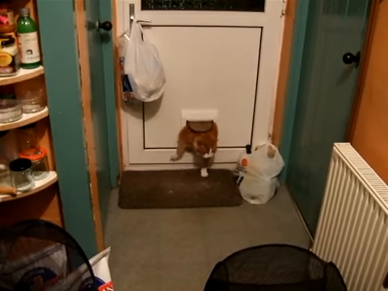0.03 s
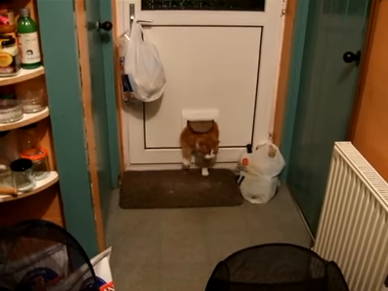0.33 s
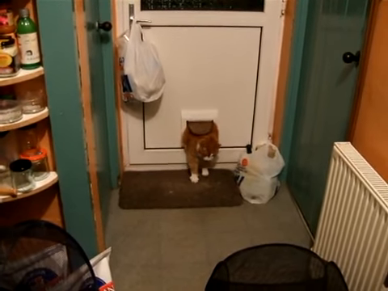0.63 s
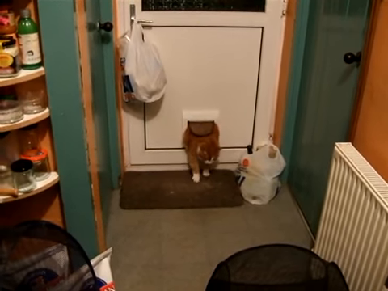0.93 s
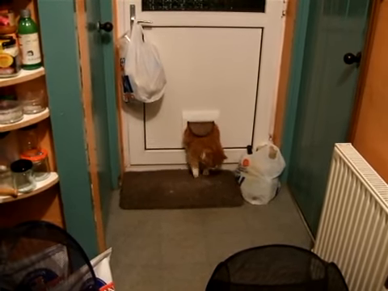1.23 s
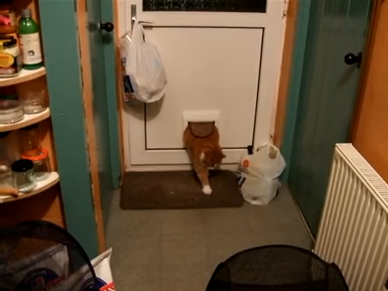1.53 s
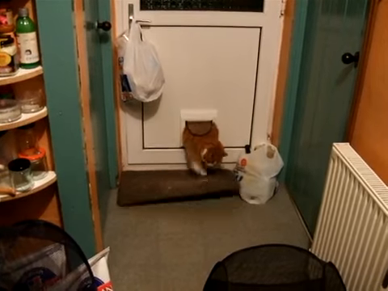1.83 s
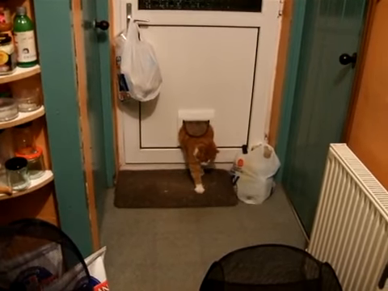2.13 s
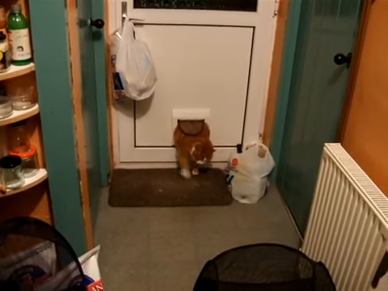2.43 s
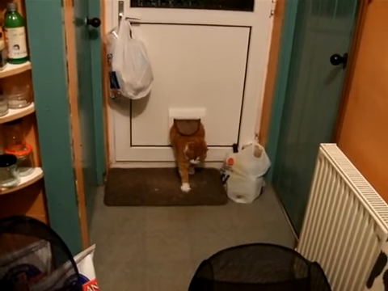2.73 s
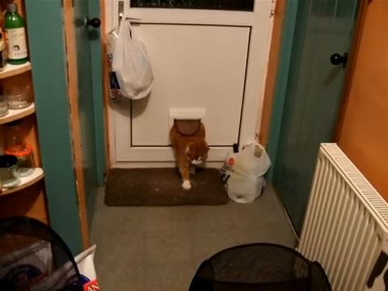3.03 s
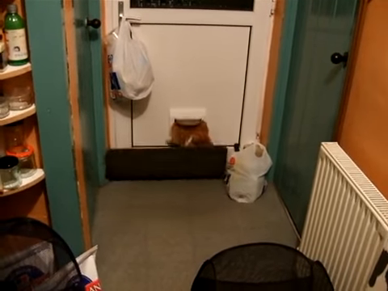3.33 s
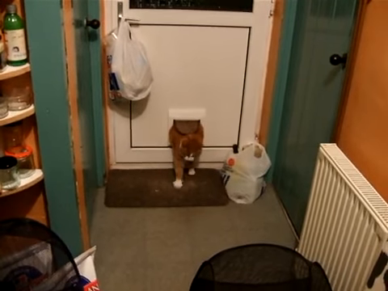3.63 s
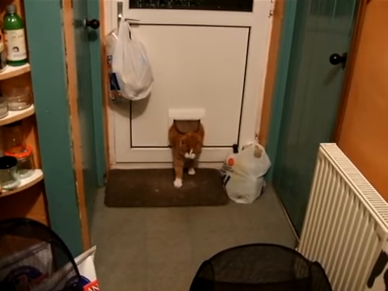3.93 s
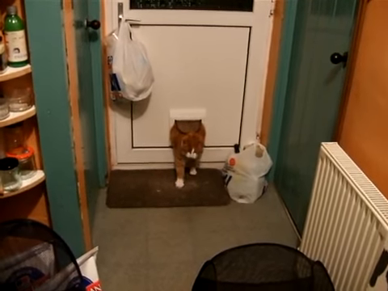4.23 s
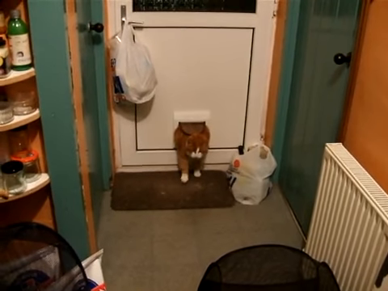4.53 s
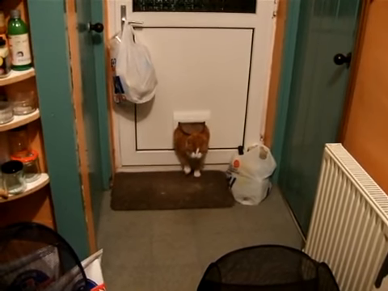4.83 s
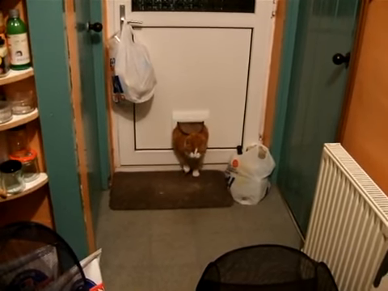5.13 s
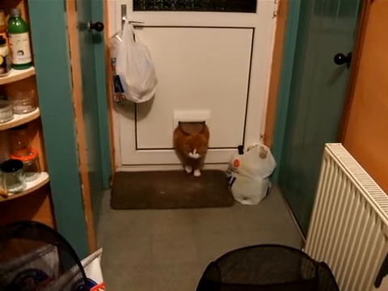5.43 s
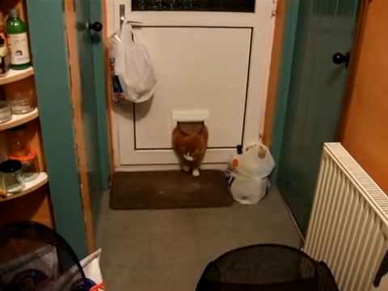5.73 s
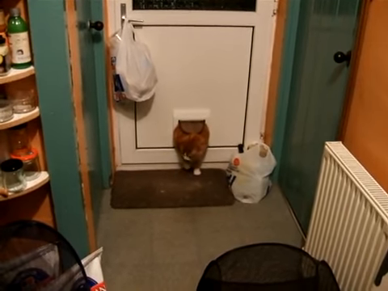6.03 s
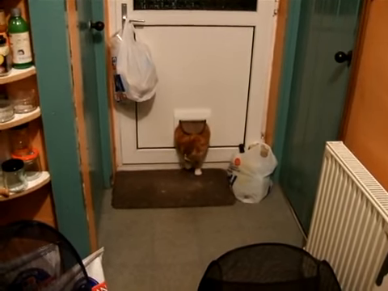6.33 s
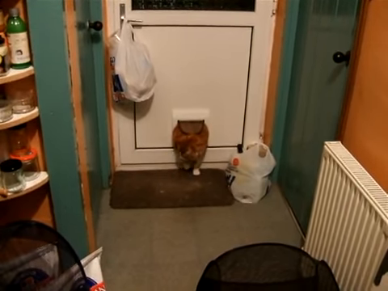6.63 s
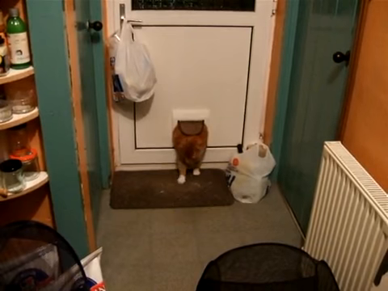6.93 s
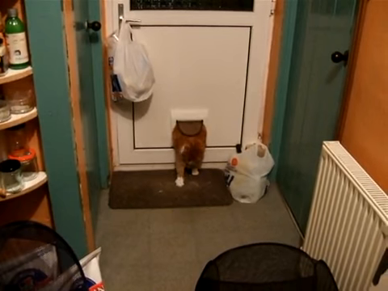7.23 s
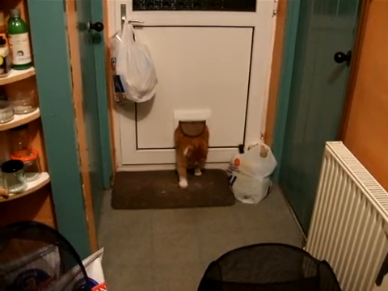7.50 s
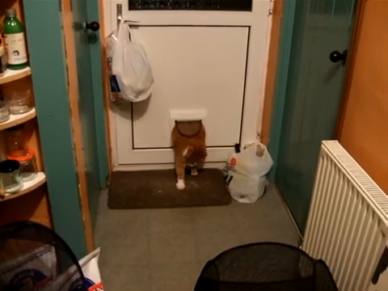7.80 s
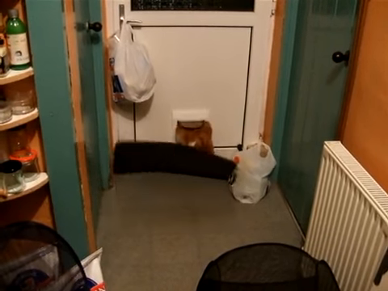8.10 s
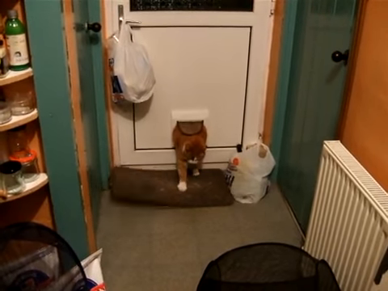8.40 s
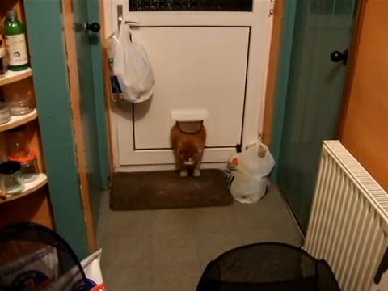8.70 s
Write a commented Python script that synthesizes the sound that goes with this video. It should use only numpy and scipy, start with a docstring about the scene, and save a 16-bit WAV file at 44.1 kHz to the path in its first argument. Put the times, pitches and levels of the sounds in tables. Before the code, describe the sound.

In a small, hard-walled hallway, a cat plucks at a bristly doormat and thumps a door with its paws. The mat scrapes, metal clinks, and then the mat slaps down with a loud, hollow snap. In a lull the cat mews once, faintly. The scratching resumes, ending in more flapping, slaps and a metallic ring. A small microphone picks up steady room hiss and a faint appliance hum underneath.

```python
"""Cat at the doormat

Halfway through a door flap, a cat paws at a bristly mat in a small, hard-walled hallway. Its paws
thump the door; its claws pluck the pile, drag the mat, lift it twice and let it slap back, many of the
hits with a short, hollow ring. Something metal is knocked and rings. In a pause the cat mews faintly.
Underneath, an appliance hums in the hiss of the room."""
import sys
import numpy as np
from scipy import signal
from scipy.fft import rfft, irfft, next_fast_len
from scipy.io import wavfile
from scipy.ndimage import uniform_filter1d, map_coordinates

SR = 44100
rng = np.random.default_rng(int(sys.argv[2]) if len(sys.argv) > 2 else 0)


def dump_mix(stems):
    """Bounce the given channels to the path in sys.argv[1] as a 16-bit WAV at rate SR."""
    frames = np.atleast_2d(stems).T  # one column per channel
    limited = np.clip(frames, -1, 1)  # hard clip at full scale
    pcm = np.round(limited * 32767).astype(np.int16)
    wavfile.write(sys.argv[1], SR, pcm)


N = 386316
RING = SR * 3 // 4  # samples given to one hit or one reverb tail

# Tone curves for the room's hiss and the microphone. Each row: frequency in Hz, gain in dB.
ROOM_TONE_EQ = [(12, -45), (20, -3.5), (71, -5), (250, -10), (420, -8.5), (552, -12), (807, -14.5),
                (8500, -22)]
MICROPHONE_EQ = [(8000, -0.5), (8600, -9.5), (9200, -18.5), (10250, -44.5)]
# The appliance's hum. Each row: frequency in Hz, average level in dB.
HUM_TONES = [(420, -59)]
# The hallway's reverb tail. Each row: frequency in Hz, t60 in seconds.
HALL_DECAY = [(300, 0.52), (1000, 0.32), (9000, 0.33)]
# The cat's throat resonances. Each row: centre in Hz with the mouth shut, centre in Hz with it
# wide open, half-width in Hz, gain in dB.
FORMANTS = [(520, 560, 110, -3.5), (1120, 1250, 200, -2), (1600, 2130, 170, -5.5), (1900, 2690, 115, 0),
            (4200, 3980, 120, -11)]
# The metal's modes. Each row: frequency in Hz, level in dB, free-ringing t60 in seconds.
METAL_MODES = [(2240, -7, .24), (2403, -3, .2), (2452, 1.5, .31), (3176, -6, .25), (3262, -7, .27),
               (4209, -2.5, .26), (4345, -7, .16), (5200, -13, .14), (5768, .5, .16), (7410, -11, .16),
               (8590, -17, .16)]
# Low resonances of the door and of the mat on the floor. Each row: centre in Hz, width in Hz, gain in dB.
DOOR_MODES = [(92, 11, 2.5), (150, 15, 3.5), (201, 37, -7.5), (283, 17, -6.5), (306, 110, -10)]
MAT_MODES = [(173, 65, -5), (293, 20, 7), (336.6, 43, 6), (386, 55, 2), (426, 57, 0.5)]
# Tone curves for the contact sounds. Each row: frequency in Hz, gain in dB.
BRISTLE_EQ = [(1200, -21), (2100, -3.5), (2700, -6.5), (4000, -4), (7000, -2.5), (10000, -8.5)]  # bright hiss of sliding bristles
RUB_EQ = [(200, -14), (450, -9.5), (850, -2), (1150, -7), (1700, -17), (3500, -17)]  # dull rub of the backing
THUD_EQ = [(52, -40.5), (74, -7), (90, 1.5), (150, 5.5), (240, -6.5), (345, 1.5), (520, -14), (1200, -34)]  # padded blow on the door
KNOCK_EQ = [(250, -16), (420, -4), (540, -1), (780, 4.5), (1050, 2.5), (1300, -5), (2200, -26.5)]  # boxy middle of a hit
CRUNCH_EQ = [(55, -35), (250, -7.5), (1200, -2.5), (2400, -8), (4000, -14), (9000, -24)]  # crushed fibres
PLUCK_EQ = [(250, -19.5), (430, -6.5), (560, -7.5), (790, 1), (980, -6.5), (1250, -11), (1700, -16),
            (4000, -35)]  # hollow body of a claw pluck
SCRATCH_EQ = [(1200, -57), (2400, 2), (4200, 1), (7500, -8), (10000, -4.5)]  # sharp edge of a scratch or crack
CLACK_EQ = [(600, -24), (950, 11.5), (1400, 4.5), (2500, -4.5), (5000, -30.5)]  # stiff backing striking

# Knocks on the metal. Each row: start in seconds, level in dB, most excited frequency in Hz,
# spread around it in octaves, ring time as a share of the free ring.
METAL_KNOCKS = [(1.321, -23.5, 2255, 0.052, 0.68), (1.325, -25, 4370, 0.3, 0.69),
                (1.353, -25.5, 3100, .6, 0.44), (3.625, -23.5, 8400, 0.15, 0.24),
                (8.041, -20.5, 8240, 0.11, 0.68), (8.081, -26, 4180, .06, 0.77),
                (8.367, -15, 3340, 0.87, 1)]
# The mat's bristles sliding over floor and door, and its backing flapping while lifted.
# Each row: start in seconds, length in seconds, relative level in dB.
BRISTLE_SWEEPS = [(1.232, 0.37, -36.5), (1.868, 0.13, -29.5), (2.021, 0.054, -30.5), (3.184, 0.44, -29.5),
                  (3.56, 0.055, -35.5), (3.703, 0.17, -47), (8.002, 0.13, -24), (8.166, 0.83, -36)]
BACKING_FLEXES = [(1.526, 0.077, -50.5), (1.882, 0.078, -41), (2.11, 0.048, -37), (3.288, 0.12, -31),
                  (3.581, 0.032, -27.5), (8.088, 0.14, -26.5), (8.262, 0.15, -32.5)]
# Short, hollow, pitched rings of claw plucks, paw thumps and the mat flapping or landing.
# Each row: time in seconds, relative level in dB, pitch in Hz, t60 in seconds.
HOLLOW_RINGS = [(0.223, -37.5, 840, 0.048), (1.173, -38, 424, .09), (1.503, -30, 405, .1),
                (1.915, -33, 397, 0.071), (2.101, -16.5, 790, 0.013), (2.11, -21, 418, 0.015),
                (2.494, -22.5, 698, 0.041), (3.595, -28, 384, .06), (3.625, -13, 167, 0.028),
                (3.626, -14, 382, 0.078), (3.642, -21.5, 365.6, 0.35), (7.393, -24, 505, 0.041),
                (8.105, -31, 148, 0.046), (8.143, -26.5, 332, 0.077), (8.189, -23.5, 290, 0.1),
                (8.28, -22.5, 494, 0.19), (8.538, -22, 377, 0.3)]
# Paws and body hitting door and mat. Each row: time in seconds, relative thud and crunch levels in dB.
PAW_THUMPS = [(0.005, -46, -39), (0.22, -35.5, -44), (0.494, -43.5, -76), (0.776, -36, -46),
              (1.5, -29, -50), (1.626, -32.5, -35.5), (2.095, -22, -17), (2.112, -25.5, -26),
              (2.26, -33.5, -38), (2.709, -34.5, -58), (2.844, -35, -33.5), (4.633, -38.5, -53),
              (7.184, -37.5, -41.5), (7.592, -25.5, -35.5), (7.696, -31.5, -33), (7.913, -30, -40),
              (8.537, -32.5, -32)]
# Claws in the pile. Each row: time in seconds, pluck and scratch levels in dB, swell time in seconds.
CLAW_PLUCKS = [(0.66, -48.5, -44.5, 0.0061), (0.914, -43.5, -45.5, 0.0024), (1.174, -43, -40, 0.0021),
               (1.811, -33, -38.5, 0.006), (1.913, -25.5, -24.5, 0.0016), (2.451, -32, -35, 0.02),
               (2.498, -24, -29, 0.0052), (3.042, -44, -52, 0.0062), (3.103, -45.5, -46.5, 0.0063),
               (3.173, -33, -34.5, 0.0011), (4.489, -44, -50.5, 0.013), (5.28, -55, -46.5, .0072),
               (6.065, -48.5, -66, 0.0035), (7.257, -37, -44.5, 0.0027), (7.389, -26.5, -32.5, 0.0081),
               (8.53, -25, -29, 0.0096), (8.673, -41, -42, 0.0038)]
# The mat whipping and landing. Each row: time in seconds, relative smack, boom, clack and crack
# levels in dB, contact t60 in seconds.
MAT_SLAPS = [(1.323, -18.5, -39.5, -23.5, -25.5, 0.088), (1.351, -28, -30, -29.5, -21, 0.014),
             (1.424, -21, -54, -21.5, -29, 0.016), (1.436, -37, -59, -24, -43, 0.015),
             (3.624, -25.5, -18, -30, -30.5, 0.012), (3.684, -36, -22.5, -53, -64, 0.08),
             (8.041, -20.5, -28, -35, -16, 0.014), (8.366, -20.5, -31, -21.5, -18, 0.012),
             (8.535, -20, -29, -19.5, -16, 0.041)]


def amp(db):
    """Decibels to gain."""
    return 10 ** (np.asarray(db) / 20)


def unit(x):
    """x at rms 1."""
    return x / np.sqrt(np.mean(x ** 2) + 1e-20)


def crest(x):
    """x with its loudest moment at rms 1."""
    return x / np.sqrt(uniform_filter1d(x ** 2, size=512).max() + 1e-20)


def along(points, hz):
    """(Hz, value) points read on a log axis."""
    freqs, values = np.transpose(points)
    return np.interp(np.log(hz + 1), np.log(freqs), values)


def wobble(rate):
    """A smooth random curve, rate knots a second."""
    knots = rng.standard_normal(int(N * rate / SR) + 4)
    return map_coordinates(knots, [np.arange(N) * rate / SR])


def envelope(start, length, attack, t60, sag_db_per_s=0):
    """Fade in, hold or sag while the effort lasts, then die away; times in seconds."""
    t = np.arange(N) / SR - start
    sag_db = sag_db_per_s * np.maximum(t - attack, 0)
    release_db = 60 * np.maximum(t - length, 0) / t60
    return np.clip(t / attack, 0, 1) * amp(-sag_db - release_db)


def add(track, start, sound):
    """Mix a sound into the track at start seconds."""
    first = max(round(start * SR), 0)
    track[first:first + len(sound)] += sound[:N - first]


def filtered(x, response):
    """x times a complex response of frequency."""
    size = next_fast_len(len(x) + SR // 4)
    return irfft(rfft(x, size) * response(np.fft.rfftfreq(size, 1 / SR)), size)[:len(x)]


def equalised(x, curve):
    """x through a minimum-phase EQ, so nothing rings ahead of an attack."""
    taps = 1024
    cepstrum = irfft(np.log(amp(along(curve, np.fft.rfftfreq(2 * taps, 1 / SR)))))
    causal = np.r_[cepstrum[0], 2 * cepstrum[1:taps]]
    response = irfft(np.exp(rfft(causal, 2 * taps)))
    return signal.fftconvolve(x, response[:taps])[:len(x)]


def resonance(hz, centre, width):
    """The band-pass response of one mode."""
    return 1j * hz * width / (centre ** 2 - hz ** 2 + 1j * hz * width)


def boom(x, modes, low_cut_hz=50):
    """x through the low resonances of a body too small to radiate the deepest bass."""
    def response(hz):
        body = sum((-1) ** k * amp(db) * resonance(hz, centre, width)
                   for k, (centre, width, db) in enumerate(modes))
        return body * (1j * hz / (1j * hz + low_cut_hz)) ** 2
    return filtered(x, response)


def grains(count, per_second, spread_db):
    """Tiny snaps of fibres at random moments and of uneven size."""
    snaps = rng.standard_normal(count) * (rng.random(count) < per_second / SR)
    return snaps * amp(spread_db * rng.standard_normal(count))


def contact(rise, t60, lead):
    """A crush of fibres that swells for lead seconds, then dies away."""
    t = np.arange(RING) / SR - lead
    swell = np.exp(np.minimum(t, 0) / rise)
    decay = amp(-60 * np.maximum(t, 0) / t60)
    return grains(RING, per_second=6000, spread_db=4) * swell * decay


def hallway(direct_db=-6, early_t60=0.17, tail_db=-4):
    """A fresh room response: direct sound, dense echoes from the close walls, a longer tail."""
    t = np.arange(RING) / SR
    hz, frame_s, spectrum = signal.stft(rng.standard_normal(RING), SR, nperseg=256)
    decay = amp(-60 * frame_s / along(HALL_DECAY, hz)[:, None])
    tail = signal.istft(spectrum * decay, SR, nperseg=256)[1][:RING]
    early = rng.standard_normal(RING) * amp(-60 * t / early_t60)
    response = unit(early) + amp(tail_db) * unit(tail) + amp(direct_db) * unit(1. * (t == 0))
    return response / np.linalg.norm(response)


def in_hall(x, **reverb):
    """x as it arrives through the hallway."""
    return signal.fftconvolve(x, hallway(**reverb))[:len(x)]


def room_tone(level_db=-49):
    """A steady bed of hiss and rumble, flat above 7500 Hz."""
    air = filtered(rng.standard_normal(N), lambda hz: amp(along(ROOM_TONE_EQ, np.minimum(hz, 7500))))
    return amp(level_db) * unit(air)


def appliance_hum(waver_db=2.5):
    """An appliance's tone, slightly unsteady in level and phase."""
    t = np.arange(N) / SR
    return sum(amp(db - waver_db * wobble(4.5)) * unit(np.sin(2 * np.pi * hz * t + wobble(9.9)))
               for hz, db in HUM_TONES)


def throat(hz, mouth):
    """The throat's gain at hz; its formants glide as the mouth goes from shut (0) to open (1)."""
    return sum(amp(db) / (1 + ((hz - shut - mouth * (wide - shut)) / half_width) ** 2)
               for shut, wide, half_width, db in FORMANTS)


def mew(start=5.405, attack=0.115, pitch_hz=675.6, sag_hz_per_s=155, flutter_db=2.8):
    """A thin, faint call on one gape of the mouth; the pitch sinks once the voice has swelled."""
    t = np.arange(N) / SR - start
    mouth = np.interp(t, np.cumsum([0, 0.051, 0.11, 0.3]), [0, 1, 1, 0])  # open, hold, close
    catch = np.clip(1 - t / 0.035, 0, 1)  # the voice catches rough and high
    fail = np.clip((t - 0.42) / 0.053, 0, 1)  # and gives out rough and low
    pitch = pitch_hz - sag_hz_per_s * np.maximum(t - attack, 0) + 132.4 * catch - 117.5 * fail
    waver = 0.0071 * wobble(14) + 0.00526 * wobble(70)
    rasp = 0.11 * np.sqrt(catch + fail) * wobble(350)
    pitch *= 1 + waver + rasp
    phase = 2 * np.pi * np.cumsum(pitch) / SR
    voice = sum(throat(k * pitch, mouth) * amp(flutter_db * wobble(36)) * np.sin(k * phase)
                for k in range(1, 8))
    call = amp(-47) * envelope(start, length=0.454, attack=attack, t60=0.13, sag_db_per_s=6) * voice
    return call + amp(-3) * in_hall(call)


def metal_clangs(scatter_db=1.2, free_chatter_rad=0.3, reverb_db=-6):
    """Each knock wakes a different part of the metal's modes; the more damped, the more it chatters."""
    out, t = np.zeros(N), np.arange(RING) / SR
    hz, mode_db, t60 = np.transpose(METAL_MODES)[:, :, None]
    for start, db, centre_hz, spread, free in METAL_KNOCKS:
        strength = amp(mode_db + scatter_db * rng.standard_normal(hz.shape))
        strength *= np.exp(-0.5 * (np.log2(hz / centre_hz) / spread) ** 2)
        jitter = unit(uniform_filter1d(rng.standard_normal((len(hz), RING)), size=200))
        phase = 2 * np.pi * hz * t + free_chatter_rad / free * jitter
        ring = np.sum(strength * amp(-60 * t / (free * t60)) * np.sin(phase), axis=0)
        add(out, start, amp(db) * crest(crest(ring) + amp(reverb_db) * crest(in_hall(ring))))
    return out


def mat_drags(jerk_db=0.8):
    """Bristles hiss over floor and door in small jerks while the backing rubs and flexes."""
    sweep = sum(amp(db) * envelope(start, length, attack=0.048, t60=0.088, sag_db_per_s=27)
                for start, length, db in BRISTLE_SWEEPS)
    flex = sum(amp(db) * envelope(start, length, attack=0.046, t60=0.49)
               for start, length, db in BACKING_FLEXES)
    rub = np.hypot(amp(-4) * sweep, amp(-1) * flex)  # the backing rubs with either motion
    jerks = amp(jerk_db * wobble(45))

    def fibres(per_second):
        return grains(N, per_second, spread_db=-1) * jerks

    hiss = sweep * unit(equalised(fibres(3000), BRISTLE_EQ))
    backing = rub * unit(equalised(fibres(1800), RUB_EQ))
    mat = amp(-2) * unit(boom(fibres(600), MAT_MODES))
    door = amp(-6) * unit(boom(fibres(600), DOOR_MODES))
    return in_hall(hiss + backing, direct_db=4, early_t60=0.054, tail_db=0.5) + flex * (mat + door)


def hollow_rings(trim_db=-1, lead=0.002045):
    """A pluck, thump, flap or landing excites one resonance, which rings briefly at its own pitch."""
    out = np.zeros(N)
    for time, db, pitch_hz, t60 in HOLLOW_RINGS:
        hit = contact(rise=0.0019, t60=0.027, lead=lead)
        heard = in_hall(hit, direct_db=4.5, early_t60=0.071, tail_db=-3)
        width_hz = np.log(1000) / np.pi / t60
        ring = filtered(heard, lambda hz: resonance(hz, pitch_hz, width_hz))
        add(out, time - lead, amp(db + trim_db) * crest(ring))
    return out


def paw_thumps(lead=0.002):
    """A padded blow gives the door one dull push and crushes a few fibres; harder is brighter."""
    out = np.zeros(N)
    for time, thud_db, crunch_db in PAW_THUMPS:
        heard = in_hall(contact(rise=0.0011, t60=0.018, lead=lead))
        push = hallway(direct_db=-3.5, early_t60=0.33, tail_db=-5.5)
        thud = crest(equalised(push, THUD_EQ)) + amp(-11) * crest(boom(push, DOOR_MODES))
        add(out, time, amp(thud_db - 1) * crest(thud))
        knock_db = -22 + 1.4 * (thud_db + 19)  # the knock grows faster than the thud
        knock = amp(knock_db) * crest(equalised(heard, KNOCK_EQ))
        cutoff_hz = 5000 * amp(crunch_db + 37)  # a gentler crunch is duller
        crunch = filtered(equalised(heard, CRUNCH_EQ), lambda hz: 1 / (1 + (hz / cutoff_hz) ** 4))
        add(out, time - lead, knock + amp(crunch_db - 2) * crest(crunch))
    return out


def claw_plucks():
    """A claw tightens in the pile, then tears free with a hollow scratch."""
    out = np.zeros(N)
    for time, pluck_db, scratch_db, swell in CLAW_PLUCKS:
        lead = min(4 * swell, time)
        heard = in_hall(contact(rise=swell, t60=0.021, lead=lead))
        pluck = amp(pluck_db) * crest(equalised(heard, PLUCK_EQ))
        scratch = amp(scratch_db) * crest(equalised(heard, SCRATCH_EQ))
        add(out, time - lead, pluck + scratch)
    return out


def mat_slaps(push_s=0.001, lead=0.002):
    """The stiff backing cracks; the air squeezed from under it booms on in the hallway."""
    out = np.zeros(N)
    age = np.arange(RING) / SR / push_s
    air_push = (1 - age) * np.exp(-age) * -np.expm1(-10 * age)  # pressure, then suction
    air_push = np.roll(air_push, round(2 * lead * SR))
    for time, smack_db, boom_db, clack_db, crack_db, t60 in MAT_SLAPS:
        force = contact(rise=0.0016, t60=t60, lead=lead)
        heard = in_hall(force)
        close = in_hall(force, direct_db=3, early_t60=0.046, tail_db=4)
        body = amp(boom_db - 2) * crest(boom(heard, MAT_MODES))
        smack = amp(smack_db) * crest(equalised(heard, KNOCK_EQ))
        # only a heavy, flat landing pushes out a gulp of air and shakes the door
        weight = amp(2 * boom_db) * (amp(9) * crest(boom(heard, DOOR_MODES)) + amp(24) * air_push)
        clack = amp(clack_db) * crest(equalised(heard, CLACK_EQ))
        crack = amp(crack_db) * crest(equalised(close, SCRATCH_EQ))
        add(out, time - lead, body + smack + weight + clack + crack)
    return out


def edge_snap(start=3.624, level_db=-9):
    """The mat falls flat and its edge hits the floor with a short, dry snap."""
    out = np.zeros(N)
    snap = np.diff(contact(rise=1, t60=0.042, lead=0))  # tilted towards the treble
    add(out, start, amp(level_db) * crest(snap))
    return out


def scene():
    """The mono mix: the tussle with the mat in front, the mew and the room behind."""
    tussle = paw_thumps() + claw_plucks() + mat_slaps() + edge_snap() + hollow_rings() + mat_drags()
    return (tussle + metal_clangs() + mew() + room_tone() + appliance_hum())[None]


def record(dry):
    """A small microphone whose treble falls away steeply."""
    top_hz = 10255
    return filtered(dry[0], lambda hz: amp(along(MICROPHONE_EQ, hz)) * (hz < top_hz))[None]


dry = scene()
out = record(dry)
dump_mix(out)
```